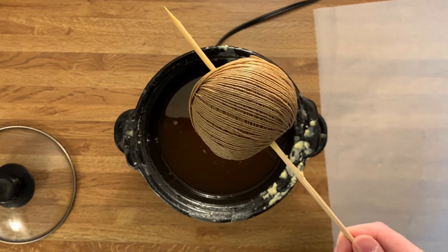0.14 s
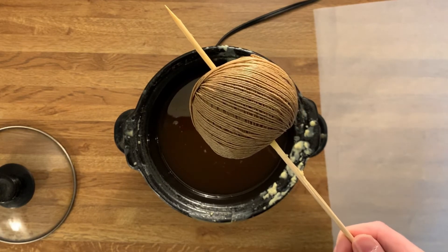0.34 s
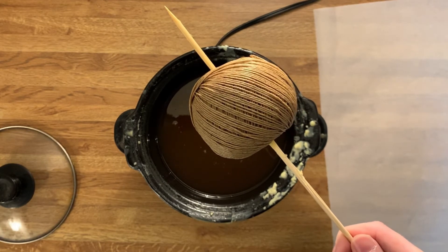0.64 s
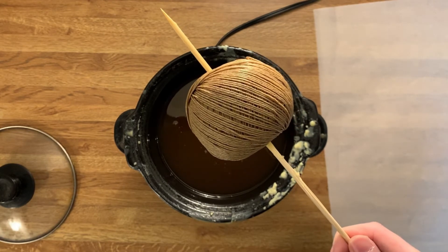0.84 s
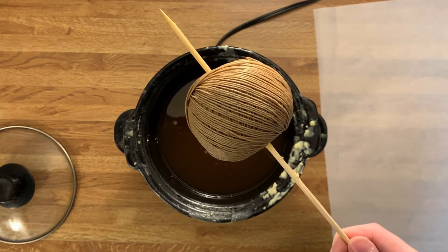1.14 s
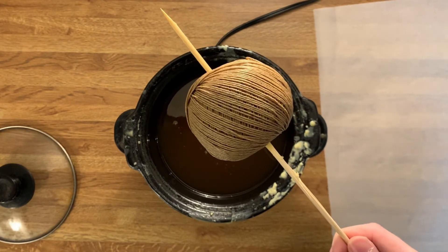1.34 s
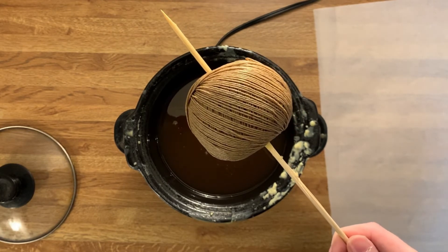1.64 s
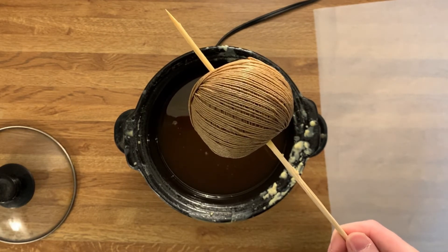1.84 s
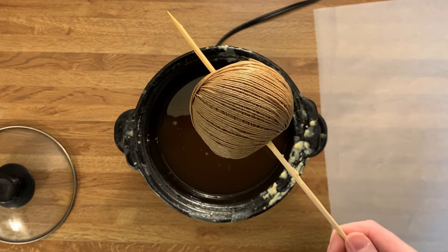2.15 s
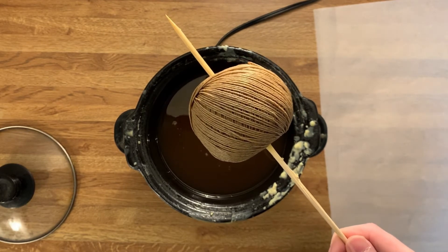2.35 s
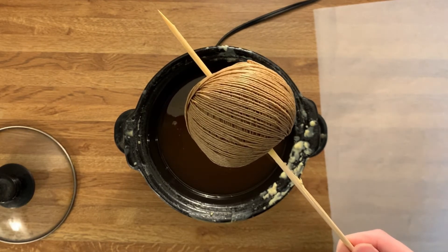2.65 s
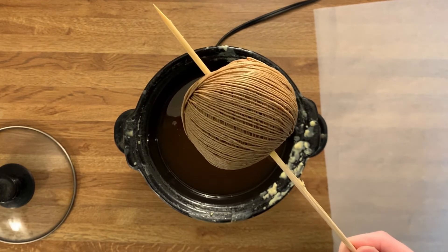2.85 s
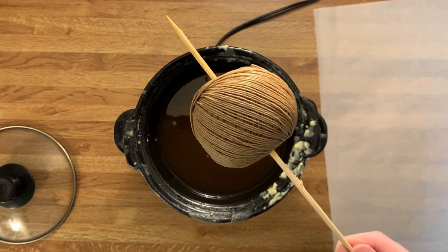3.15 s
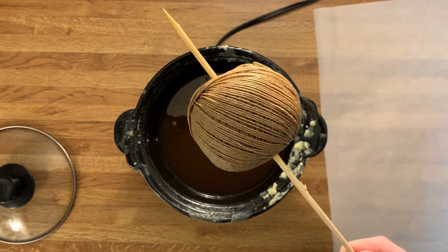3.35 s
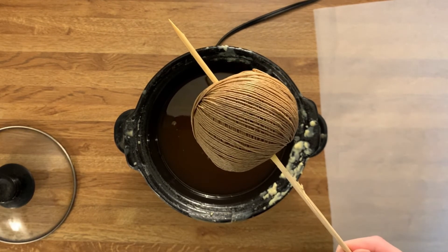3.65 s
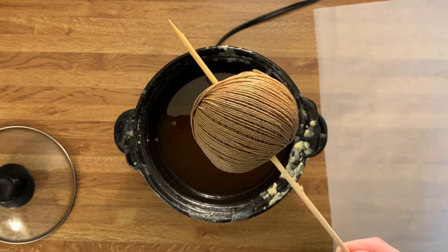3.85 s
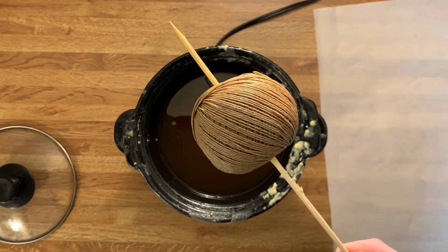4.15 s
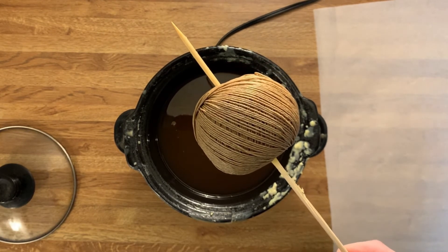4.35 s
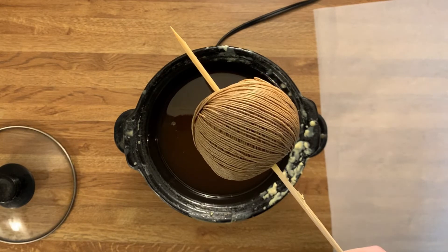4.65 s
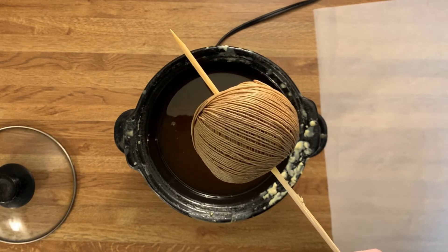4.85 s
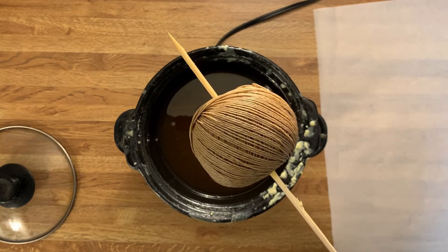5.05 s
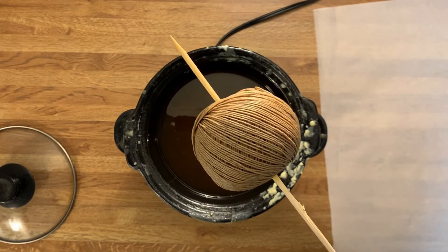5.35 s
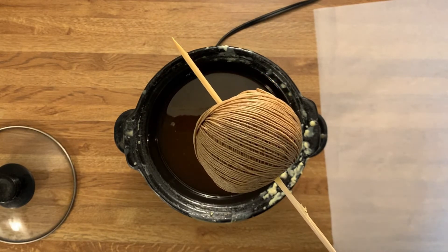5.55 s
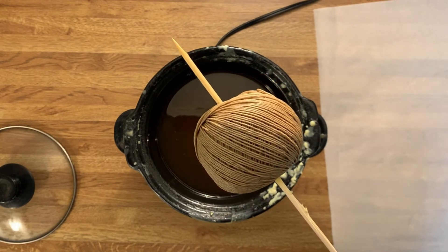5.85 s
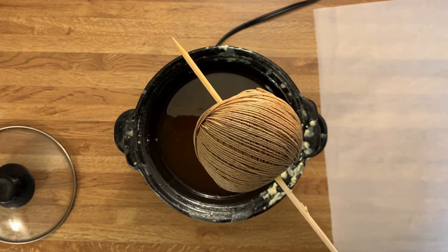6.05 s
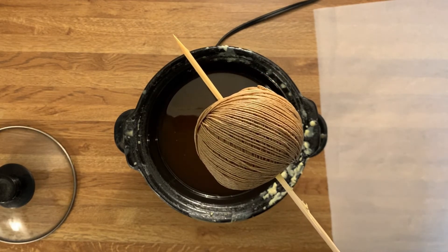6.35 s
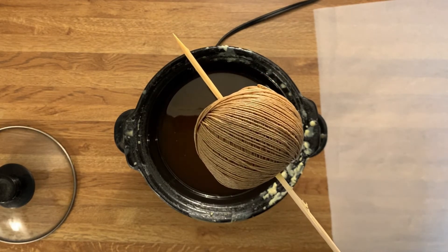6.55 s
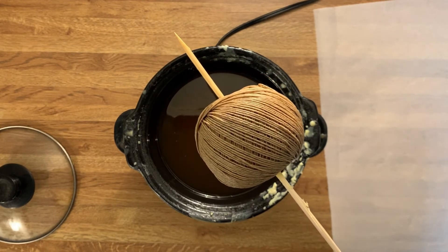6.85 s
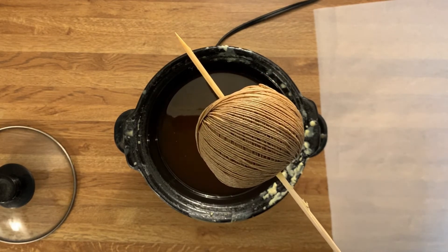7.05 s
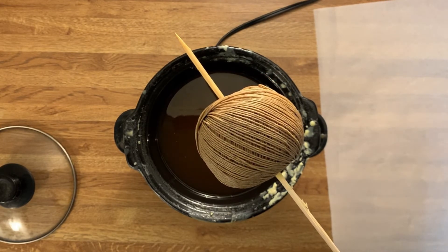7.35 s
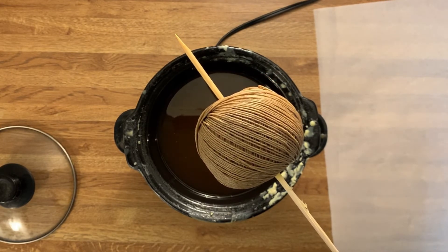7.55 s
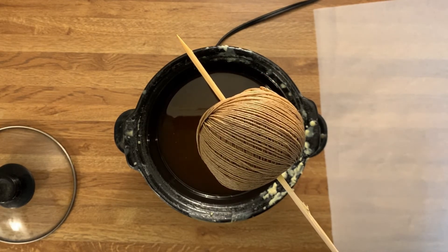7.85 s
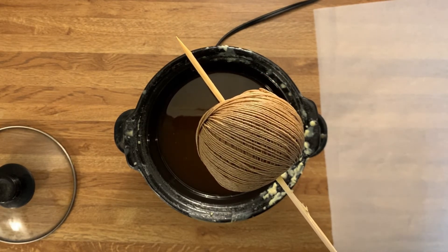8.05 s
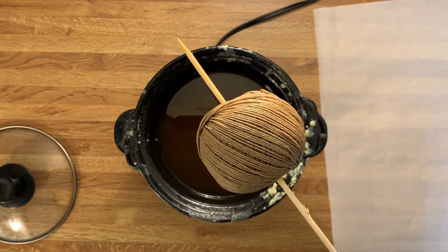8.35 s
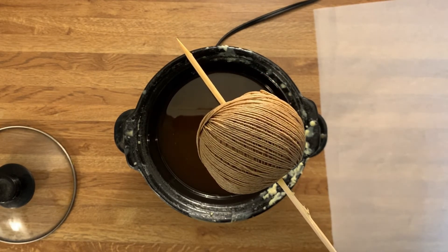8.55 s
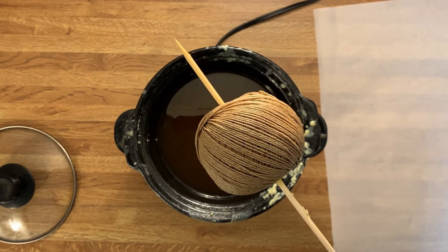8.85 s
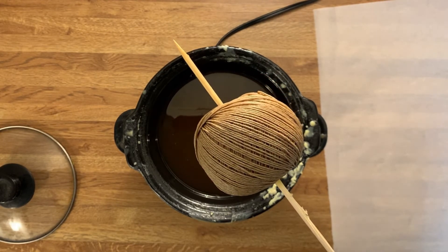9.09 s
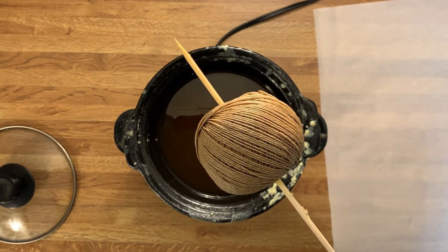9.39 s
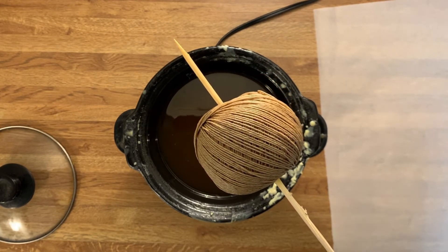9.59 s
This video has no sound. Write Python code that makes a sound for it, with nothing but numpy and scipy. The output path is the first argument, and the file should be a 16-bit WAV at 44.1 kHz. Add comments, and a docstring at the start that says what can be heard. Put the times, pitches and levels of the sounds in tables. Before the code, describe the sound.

From the start, melted wax drips quickly from a soaked ball of twine into a pot of liquid wax, heard close up indoors. The drops land irregularly, many each second, as short high plips and crisp, wet ticks, with fine spatter between them and a slight hollow ring from the pot. The patter is lighter from about 2 to 3.5 seconds, then fills out again from around 4 seconds. After about 4.5 seconds the ticks turn slightly duller, and the dripping continues in uneven flurries until the end, near 10 seconds. Underneath, an engine idling outside gives a low throbbing hum, strongest in the first second and fading by about 2.5 seconds. It swells slightly around 5 seconds, then recedes further. A faint, steady appliance hum and soft room hiss remain throughout, with very little echo.

```python
"""Melted wax drips fast from a soaked ball of twine into a pot, close under a two-port microphone.
Each drop ticks on the surface, traps a bubble and rings the hollow of the pot. An engine idles
outside and fades; an appliance motor hums indoors and beats against it."""
import sys
import numpy as np
from scipy import signal
from scipy.fft import rfft, irfft, next_fast_len
from scipy.io import wavfile
from scipy.ndimage import uniform_filter1d

SR = 44100
rng = np.random.default_rng(int(sys.argv[2]) if len(sys.argv) > 2 else 0)


def master_out(mix):
    """Clip the mix to full scale and print it as 16-bit PCM to the path in sys.argv[1]."""
    frames = np.transpose(np.atleast_2d(mix))
    ceiling = np.clip(frames, -1, 1)
    pcm = np.round(ceiling * 32767).astype(np.int16)
    wavfile.write(sys.argv[1], SR, pcm)


N = 428652

PLOPS = [(0.0248, -39.5, 1780, -3.5, 1.2), (0.1024, -44, 1967, -10.5, 14.5), (0.257, -49, 1630, -12, 3.5),
         (0.2947, -47, 1420, -20, 3.5), (0.3213, -30, 1414, -23, 2.7), (0.3666, -38.5, 2070, -14, 6.3),
         (0.4179, -42, 1884, -1.5, 3.1), (0.4662, -42.5, 1790, 0, 3.5), (0.4798, -35, 2030, -5, 1.2),
         (0.5511, -40, 1540, -8, 2.3), (0.5836, -48, 1580, -16, 3.6), (0.7183, -45, 2080, -23, 9.9),
         (0.805, -39.5, 1470, -9, 6.2), (0.84, -43.5, 1437, -4, 6.6), (0.9333, -53, 2130, -24, 4.9),
         (0.953, -46.5, 1770, -30, 4.1), (1.05, -39, 1770, -27, 1.2), (1.1214, -45.5, 1990, -5.5, 6.3),
         (1.1797, -51.5, 2100, -7, 5.5), (1.2678, -52, 1430, 1, 9.3), (1.2935, -41, 1435, -11, 7.8),
         (1.3184, -41.5, 1420, -27, 6.7), (1.4075, -47, 1925, -13, 17), (1.436, -39, 2107, -23, 6.3),
         (1.4661, -49, 2113, 1, 10.4), (1.5304, -51, 1780, -23, 5.1), (1.6282, -44.5, 1960, -25, 3.5),
         (1.6524, -46, 1760, -8, 9.5), (1.7415, -46, 2130, -1, 1.8), (1.846, -51, 2150, -3, 2.4), (1.8562, -49, 2190, -2, 3.2), (1.879, -50, 2120, -19, 3.2), (1.9307, -48, 1710, 12, 1.7),
         (2.057, -42.5, 2560, -3.5, 3.8), (2.1804, -51, 2120, 5.5, 3.8), (2.2547, -53.5, 2025, 0, 12),
         (2.4997, -52, 1990, -3, 4.4), (2.5162, -39.5, 2150, -2, 3), (2.5516, -46.5, 2020, -7, 7.6),
         (2.7606, -51.5, 1850, -6, 5.6), (2.8105, -50.5, 1740, -23, 7.8), (2.8643, -37, 2260, -29, 2.6),
         (2.9687, -43, 2045, -34, 5.7), (2.9977, -35, 2275, -21, 2.6), (3.1515, -59, 3100, -20, 1.9), (3.1547, -53, 2420, -18, 8.7),
         (3.2335, -55, 1940, -1, 5.8), (3.262, -46.5, 1760, 0, 5.3), (3.294, -51, 1664, -2, 14),
         (3.3114, -44, 1713, -6, 11.5), (3.3817, -46, 1700, -27, 1.9), (3.4426, -41, 2280, -24, 1.7),
         (3.4728, -41.5, 2190, -24, 4), (3.5468, -37, 2320, -36, 3.9),
         (3.6684, -51, 1750, 8, 2.9), (3.7087, -57, 1720, -11, 4.5), (3.7599, -45, 1690, -6.5, 2.4),
         (3.8154, -45, 1710, -14, 3.6), (3.8693, -54, 1980, -11, 5), (3.9075, -34, 2240, -21, 2.7),
         (3.9815, -50.5, 1900, 0.5, 4.2), (4.0234, -53, 1740, -17, 3.7), (4.0452, -45, 1880, -3.5, 5.1),
         (4.1131, -46.5, 2130, -5, 5.6), (4.1508, -42.5, 1930, -17, 7.3), (4.2393, -42.5, 1720, -22, 6.4),
         (4.2514, -45, 1760, -6, 4.1), (4.3041, -33.5, 2220, -26, 1.5), (4.3795, -39.5, 2190, -7, 4.7),
         (4.3841, -45, 2040, -11, 6.7), (4.4682, -37.5, 1640, -32, 1.4), (4.5057, -42, 1720, -8, 2.7),
         (4.585, -40, 2150, -26, 1.9), (4.6226, -52.5, 1870, 8.5, 6.7),
         (4.8, -42.5, 1850, -1, 1.3), (4.8978, -39, 2400, -8, 6.8),
         (4.9267, -47, 2200, -2, 6.5), (4.9495, -46, 2020, 4, 2.8), (5.002, -42, 1504, -22, 4.7),
         (5.047, -43.5, 1820, -6.5, 5), (5.1103, -43, 2060, -11, 8), (5.1637, -42.5, 2000, -12, 4.8),
         (5.1931, -38.5, 1960, -17, 2.2), (5.2128, -40.5, 1800, -11, 5.2), (5.2699, -62, 1850, -28, 3.8),
         (5.2864, -41, 2060, -21, 3), (5.3385, -44.5, 2343, -19, 2.9), (5.3875, -42.5, 2035, -7, 9.9),
         (5.455, -49, 1840, -24, 5.1), (5.491, -44, 1880, -13, 5.8), (5.5939, -36.5, 2050, -13, 3.5),
         (5.682, -42, 1940, -25, 5.4), (5.7793, -38, 2140, -10, 3.1), (5.8226, -38.5, 2030, -8.5, 4.3),
         (5.8426, -38.5, 1965, -9, 6.1), (5.9637, -39.5, 1980, -12, 4.1), (6.0623, -34, 2000, -16, 3.1),
         (6.1313, -42.5, 1860, -7.5, 9.3), (6.1564, -41, 2020, -15, 9.8), (6.1913, -42, 1770, -29, 4.1),
         (6.3034, -49.5, 2320, -6, 6.3), (6.4275, -41, 2000, -3.5, 7.1), (6.4597, -41, 2057, -12, 6.6),
         (6.4966, -43, 1870, -9, 2.6), (6.523, -42, 1990, -18, 6.4), (6.553, -43.5, 1800, -12, 7.3),
         (6.5675, -44, 1730, -8, 5.9), (6.6762, -46, 2070, -14, 6), (6.7087, -42, 1970, -20, 3.3),
         (6.7158, -38.5, 2170, -17, 3.2), (6.778, -44.5, 2040, -8, 4.3), (6.8418, -40, 2100, -22, 2.8),
         (6.8817, -46, 2300, -21, 3.4), (7.002, -46, 2010, -11, 3.5), (7.0466, -47, 2300, -26, 2.4),
         (7.0947, -51, 2130, -30, 3.4), (7.1576, -40.5, 2070, -12, 3.3),
         (7.2459, -49.5, 2140, -12, 9.4), (7.2624, -53, 2180, -15, 3.4), (7.2968, -43, 2040, -10, 3.6),
         (7.3198, -58, 2000, 7, 3.7), (7.3507, -58, 2090, -16, 4.7), (7.3771, -44.5, 2040, -18, 7.1),
         (7.4574, -41.5, 2200, -7, 4.2), (7.4854, -53, 2320, 3, 1.8), (7.52, -51, 2080, -12, 2.7),
         (7.5398, -42.5, 1930, -13, 3.4), (7.666, -41, 2100, -8.5, 2), (7.7134, -45, 1950, -19, 3.1),
         (7.7353, -48, 1790, 2, 5.1), (7.7897, -47, 2050, -9, 3.5), (7.8994, -48, 2640, -3, 2.7),
         (7.9172, -40.5, 2274, -12, 4.1), (7.9409, -56, 2080, -17, 4.1), (7.972, -38.5, 2160, -16, 5.1),
         (8.0586, -41.5, 2230, -13, 3.6), (8.1174, -46, 2120, -9, 2.8), (8.1506, -35.5, 1900, -31, 1.1),
         (8.2219, -41, 2100, -26, 2.8), (8.3115, -38.5, 2400, 0.5, 3.8), (8.4096, -52, 1800, -28, 5.7),
         (8.4361, -42, 2050, -15, 6.2), (8.4926, -56, 2480, 3, 6.9), (8.526, -46, 2240, -1, 8.1),
         (8.555, -43, 2266, -5, 4.5), (8.6318, -47, 1930, -16, 2.3), (8.6517, -44.5, 1810, -16, 2.7),
         (8.675, -38.5, 1930, -7, 4.2), (8.6986, -40, 1960, -24, 6.5), (8.7817, -38.5, 2050, -12, 2.5),
         (8.8523, -42, 2060, -4, 1.9), (8.8912, -43, 2020, -14, 4.6), (8.9116, -36, 2120, -8.5, 1.1),
         (8.954, -42.5, 2200, -11, 2.6), (8.9915, -43, 2110, -8, 4.7), (9.0508, -45, 2640, -2, 2.4),
         (9.0748, -39, 2300, -11, 3.4), (9.1147, -47.5, 2080, -8, 6.7), (9.1411, -38.5, 2035, -15, 7.4),
         (9.2878, -48.5, 2140, -15, 5.3), (9.3965, -45, 2010, -11, 4.7), (9.415, -38.5, 2170, -22, 4),
         (9.5387, -46, 1947, -17, 14), (9.5919, -46.5, 1910, 1, 17), (9.632, -40, 2060, -5, 2.7),
         (4.9595, -47.5, 1960, 10.5, 4.1), (2.0055, -60, 2380, -20, 2.2), (2.027, -54, 2450, -6, 2), (2.0465, -56, 2600, -8, 5.1),
         (2.118, -60, 2170, -14, 4.2), (2.131, -63, 2170, -6, 3.3), (2.943, -48, 1720, -27, 4.9), (2.992, -61, 2080, -20, 4),
         (3.003, -61, 2640, -10, 5.6), (3.019, -52, 2060, -19, 6.2), (3.188, -60, 2100, -12, 5), (3.849, -62, 1930, 13, 5.1), (3.881, -55, 2090, -15, 6.1),
         (7.563, -60, 2790, 7, 8), (7.599, -55, 2100, 6, 1.6), (0.4905, -40, 2040, -11, 5.3), (0.624, -50.5, 1900, -18, 5),
         (0.653, -59, 2040, 7, 6.9), (4.907, -51, 2500, -7, 2.9), (5.0135, -42, 1470, -17, 2.9)] + [(0.3419, -52, 1530, 5.5, 2.8), (0.5039, -49, 2580, -9, 7.9),
                         (0.5321, -44, 2400, -18.0, 5.6), (0.7409, -37.5, 1910, -14, 1.7),
                         (0.7562, -45, 2740, 4, 2.7), (0.764, -41, 1870, -1, 1.5),
                         (1.666, -39.5, 1840, -5.5, 1.3), (2.0759, -61, 2580, -11, 3.6),
                         (2.1925, -67, 2090, 12, 2.1), (2.6044, -52, 1420, 7, 3.5),
                         (2.6199, -49, 2750.0, -10, 5.4), (2.6476, -58, 1450, -6.0, 4.5),
                         (2.9794, -48, 1670, -25.0, 2.6), (3.5236, -41, 2100, 2, 2.2),
                         (3.9178, -46, 2600, -18, 3.3), (3.9242, -60, 2770, -8.0, 4.6),
                         (4.2035, -45, 1740, 3.5, 3), (4.3706, -52, 2240, 7, 4.3),
                         (4.9412, -43, 2000, -4, 8.9), (4.971, -42, 1890, -11, 2.5),
                         (5.726, -51, 2025, -16, 11), (6.042, -48, 2560, -13, 3.6),
                         (6.5801, -49, 1930, -3, 3.4), (6.6567, -45, 2510, -12, 2.1),
                         (7.0705, -47, 2100, -18, 3.4),
                         (7.1477, -37, 2200, -25.0, 2.7), (7.405, -45, 2340, -12, 2.4),
                         (8.2729, -43, 2750.0, -14, 2.3), (8.2903, -50, 2750.0, -20, 5),
                         (8.3253, -43.5, 2480, -1, 4.3), (8.3381, -52, 2300, 6, 4.4),
                         (8.3476, -59, 2020, 2.0, 3.2), (8.3581, -56, 2500, -4, 3.2),
                         (8.3668, -50, 2050, 1, 3.4), (8.8607, -44.5, 2045, -14, 6),
                         (9.0179, -46, 2730, -19, 2.2), (9.2259, -49, 2740, -8, 4.9),
                         (9.2429, -50, 2740, -3, 8), (9.2483, -55, 2560, -4, 2.4),
                         (9.2691, -57, 2750.0, -8.0, 2.3), (9.3037, -50, 2050, -22, 6.1),
                         (9.3105, -55, 2200, -13.0, 3.1), (9.3279, -43.5, 2400, -12, 3.5),
                         (9.3382, -45, 2700.0, 2, 2), (9.4212, -49, 2390, -18.0, 6.4),
                         (9.4277, -43, 2360, -17, 2.0), (9.4341, -58, 2500, -10.0, 1.4)]  # bubbles trapped by the larger drops: (s, level dB, pitch Hz, upper ring dB, life ms)
TICKS = [(0.046, -51, 6760), (0.0927, -47, 7000), (0.0926, -42, 10360), (0.1186, -61, 10700), (0.1393, -42, 4800),
         (0.141, -38.5, 7900), (0.1566, -32, 7500), (0.191, -43, 6800), (0.2208, -32.5, 6300), (0.2326, -37, 7700),
         (0.256, -30.5, 11100), (0.2947, -37, 10460), (0.3775, -48.5, 6400),
         (0.4212, -33.5, 10840), (0.4654, -42, 10700), (0.4798, -41, 6050), (0.5606, -45, 8250),
         (0.5886, -24, 7800), (0.6514, -50, 11200), (0.7034, -48, 6000), (0.723, -43, 7900), (0.7415, -43, 6600),
         (0.7901, -53, 6450), (0.8136, -49, 5430), (0.827, -42, 5850), (0.86, -35, 4970),
         (1.029, -48, 8200), (1.037, -42, 8300), (1.082, -53, 5400), (1.138, -48, 11500), (1.1507, -42, 8200),
         (1.223, -39, 11400), (1.265, -52, 4200), (1.2823, -28.5, 11900),
         (1.319, -45, 5500), (1.3289, -45.5, 10950), (1.3588, -45, 11250), (1.4222, -54, 5900), (1.5172, -38.5, 8400),
         (1.54, -44.5, 11300), (1.628, -54, 5900), (1.64, -48, 6000),
         (1.714, -54, 6740), (1.7412, -32.5, 10120), (1.7462, -31.5, 5460), (1.845, -45.5, 10900), (1.8779, -47, 10900),
         (1.932, -45, 4250), (2.058, -51, 6900), (2.0756, -35, 10630), (2.1184, -34.5, 5080), (2.1794, -52, 4440),
         (2.1912, -43, 11000), (2.2528, -61, 5530), (2.2873, -50, 11100), (2.366, -46, 5380),
         (2.4452, -51, 5340), (2.4589, -36.5, 4000), (2.4733, -43, 6400), (2.551, -54, 6300), (2.57, -48, 5740),
         (2.583, -50, 6130), (2.595, -29.5, 12400), (2.6314, -44, 8350), (2.6474, -52, 5840), (2.6657, -46, 9500),
         (2.7788, -50, 7800), (2.8774, -47, 5050), (2.8998, -56, 6500), (2.9346, -46, 9700),
         (2.9602, -40, 11600), (3.1512, -47, 11400), (3.169, -59, 7400), (3.18, -54, 7000), (3.187, -49, 5900), (3.2611, -50, 5370),
         (3.281, -36, 5500), (3.3246, -46, 6100), 
         (3.5465, -26.5, 7820), (3.6666, -50, 8200), (3.697, -37, 7700), (3.8556, -38.5, 4270),
         (3.8594, -40, 5200), (3.9205, -43, 5880), (3.9213, -40, 7460), (3.991, -36, 11360), (4.0224, -40, 6000),
         (4.0235, -42, 5460), (4.0457, -25.5, 7520), (4.137, -46, 8040), (4.1604, -32, 12100), (4.1611, -33, 11400),
         (4.1737, -38, 9800), (4.1924, -42, 11600), (4.2084, -35, 10700), (4.2308, -44, 7700), (4.2528, -33.5, 11200),
         (4.3116, -41, 11250), (4.3615, -43.5, 12000), (4.4345, -35, 7640), (4.4563, -47, 11300), (4.5059, -42, 7900),
         (4.5242, -42, 11300), (4.561, -54, 5950), (4.6055, -51, 6070), (4.6918, -31, 7880), (4.731, -53, 12100),
         (4.7464, -43, 5600), (4.7612, -41, 9750), (4.8638, -46, 5300), (4.898, -54, 6070), (4.9347, -46, 9900),
         (4.9507, -41, 7750), (5.0024, -32, 4200), (5.0724, -50, 5600),
         (5.2395, -53, 9900), (5.2699, -49, 7800), (5.3236, -43, 6500), (5.378, -35, 4230),
         (5.3888, -40, 7600), (5.4005, -32.5, 7170), (5.4886, -56, 10000), (5.5179, -49, 4050), (5.592, -37.5, 5660),
         (5.6155, -42.5, 9350), (5.6825, -48.5, 4160), (5.7648, -48, 4160), (5.779, -48, 5270), (5.8506, -56, 4130),
         (5.8506, -32, 9260), (5.964, -52, 4160), (6.0725, -59, 3940), (6.0696, -50, 5800), (6.134, -49, 5760),
         (6.1564, -45, 6000), (6.195, -48, 9500), (6.215, -41, 7040), (6.301, -56, 4470), (6.3704, -49, 7030),
         (6.4367, -45, 4230), (6.4966, -49, 9600), (6.5544, -48, 7700),
         (6.6089, -51, 9900), (6.6992, -48, 5670), (6.841, -43, 8330), (7, -55, 4060), (7.0563, -46, 10200),
         (7.0564, -46, 11160), (7.1178, -41, 9500), (7.1937, -56, 9900), (7.2397, -57, 5330),
         (7.2849, -52, 5940), (7.3195, -47, 5800), (7.3627, -48, 9400), (7.4233, -45.5, 7700), (7.4576, -47.5, 6130),
         (7.5845, -54, 10000), (7.63, -43.5, 7230), (7.7104, -47, 7900),
         (7.7255, -37, 7900), (7.8267, -54, 7430), (7.9164, -57, 5270), (7.943, -46, 11900),
         (7.9738, -44.5, 6160), (8.0586, -53.5, 5950), (8.1394, -48, 7800), (8.1406, -41, 9900),
         (8.2003, -56, 7760), (8.3115, -44, 7700), (8.334, -40, 7400), (8.3852, -56, 10000), (8.427, -54, 10500),
         (8.4554, -51.5, 5900), (8.525, -51, 5900), (8.5629, -41, 11500), (8.5862, -41, 7800),
         (8.611, -59, 4770), (8.6588, -38, 7800), (8.6915, -60, 8000), (8.694, -37.5, 7500),
         (8.7833, -44.5, 7160), (8.8518, -34.5, 7700), (8.8742, -47, 9600),
         (8.8907, -57, 9600), (8.92, -48, 7500), (9.0186, -55, 4100), (9.102, -54, 9900), (9.1315, -47, 4050),
         (9.1308, -49, 4040), (9.1484, -37.5, 5900), (9.2665, -53, 5960), (9.3105, -32.5, 9400),
         (9.4136, -36, 7750), 
         (9.5476, -40.5, 6500), (9.632, -53, 4270), (9.6437, -39, 7300), (4.9597, -46, 10100), (8.3402, -51, 6450), (8.336, -39, 4100), (8.352, -40, 4070), (8.3865, -58, 7500), (8.3479, -52, 7760), (4.9077, -49, 5950)] + [(0.0871, -40, 7900), (0.2025, -58, 6000.0),
                         (0.4915, -36, 4900), (0.5235, -43, 11400), (0.6634, -49, 8600),
                         (0.6754, -54, 9300), (0.7956, -45, 8350), (0.839, -56, 11600),
                         (0.879, -43, 12200), (0.9531, -53, 8140), (1.1455, -49, 8000),
                         (1.1932, -49, 11200), (1.239, -50, 11300), (1.3335, -54, 9300),
                         (1.5322, -53, 9300.0), (1.5592, -52, 9800), (1.6892, -54, 8100),
                         (1.8564, -39, 11100), (1.8663, -61, 11600), (2.131, -38, 5600),
                         (2.1381, -50, 5600), (2.2653, -37.5, 9050), (2.6047, -35, 9200),
                         (2.6202, -50, 8700), (2.707, -50.5, 8000.0), (2.9683, -50, 13500),
                         (3.1625, -44, 12300), (3.2711, -53, 7800), (3.3065, -47, 9150),
                         (3.3327, -41, 5170), (3.4719, -38.5, 9200), (3.5234, -48.0, 8500),
                         (3.6782, -35, 8360), (4.0144, -42, 7850), (4.2033, -43, 7900),
                         (4.3708, -49, 5600), (4.65, -46.5, 5500), (4.7719, -44, 9550),
                         (4.9654, -48, 7850), (4.9712, -52, 9800), (5.0132, -41, 11800),
                         (5.0937, -44, 5920), (5.286, -50, 5400.0), (5.2982, -43, 9550),
                         (5.3105, -60, 10000), (5.431, -46, 9400), (5.573, -52, 9700),
                         (5.8415, -47, 8100), (5.8852, -50, 11900.0), (5.9864, -49, 8500),
                         (6.2054, -54, 9700), (6.231, -52, 9600), (6.2408, -44.5, 8050),
                         (6.4651, -46, 7500), (6.5245, -45, 8460), (6.56, -55, 9130),
                         (6.5683, -47, 7700.0), (7.0716, -53, 9900), (7.1838, -52, 8000),
                         (7.1943, -40, 10100), (7.6879, -45, 8900), (8.1311, -44, 7900),
                         (8.1493, -59, 9400), (8.537, -54, 9450), (8.5552, -50.5, 4930),
                         (8.6319, -36, 8100), (8.652, -53, 7500), (8.6755, -60, 8700),
                         (8.6851, -42, 8700.0), (8.7024, -39, 7840), (8.7248, -45.5, 9600),
                         (8.8844, -40, 8800), (9.1239, -46, 9050), (9.1409, -35, 8900),
                         (9.2898, -48, 7100), (9.4047, -46.0, 8700), (9.4427, -41, 7600),
                         (9.4524, -33, 10230), (9.562, -38.5, 7700), (9.5859, -46, 9500),
                         (9.5932, -51, 9900.0), (9.6004, -60, 9700), (9.6818, -47, 8750)]  # bright ticks on the surface: (s, level dB, small bubble Hz)
# fine spatter too small to tell apart: (s, low dB, bright dB)
SPATTER = [(0, -60, -61.5), (.8, -63, -73.5), (1.4, -64.5, -66), (2, -72, -78), (2.7, -61.5, -73), (3.2, -71, -80), (3.9, -60, -70), (4.7, -60.5, -69), (5.3, -59.5, -72.5), (5.95, -56, -72), (6.4, -62, -75), (6.75, -60, -71), (7.3, -60, -70), (8.4, -61, -78), (9.2, -69, -73.5), (9.72, -58, -65)]
POT = [(1480, 60, -9), (1800, 60, -2), (2070, 60, 0), (2230, 90, -6), (2450, 120, -10), (3290, 90, -6), (3480, 90, -8)]  # hollow above the wax: (Hz, width Hz, dB)  # fixed
SNAP = [(1000, -20), (3000, -8.5), (4200, 3.5), (4800, -3), (5500, -3.5), (6900, -19.5), (7800, 2), (9000, 1), (10000, -2), (10700, -10), (11300, -2), (12500, 0), (13700, -9.5), (14900, -19), (15800, -10), (16800, -71)]  # colour of a tick while the ball hangs high: (Hz, dB)
PORTS = [(200, 0), (600, -2.3), (1460, -5.7), (2300, -4.1), (3500, -4.7), (6630, -.1), (15000, 12.3), (17000, 12.8)]  # (Hz, radians by which the left port leads)  # fixed
ROOM = [(1000, 0.22), (2600, 0.1), (7000, 0.11), (15000, 0.0073)]  # (Hz, t60 s)
ENGINE = [(0, 0), (.75, -4), (1.25, -9), (1.75, -14), (2.5, -16), (3.75, -18), (5.25, -13.5), (6.5, -16), (7.3, -21), (9.72, -24)]  # the engine draws away: (s, fade dB)  # fixed
RUMBLE = [(18, -29), (30, -18), (42, -8.5), (62, 7), (78, 0), (115, -0.5), (160, -8.5), (215, -18), (260, -31), (330, -57)]  # noise around the orders: (Hz, dB per Hz)
MOTOR = [(59.2, -57), (120, -69)]  # appliance lines: (Hz, dB)  # fixed
AIR_MID = [(100, -40), (200, -10.5), (300, 2), (430, -3), (620, 2.5), (720, -4.5), (950, 2), (1500, 2), (3000, -19), (6000, -19), (16500, -22.5)]  # room tone and hiss, sum of ports: (Hz, dB per Hz)
AIR_SIDE = [(40, -16), (60, -7.5), (130, -8.5), (250, -24), (420, -22.5), (700, -18), (1500, -19), (3000, -30.5), (6000, -44), (16500, -36)]  # difference of ports: (Hz, dB per Hz)
EDGE_HZ = 16900  # fixed
T = np.arange(N) / SR
SPEED = [(0, 12.45), (.45, 12.32), (1.35, 12.11), (3, 12.15), (4.65, 12.39), (5.2, 12.43), (9.72, 12.43)]  # idling engine: (s, cycles a second)  # fixed
UPPER_HZ, UPPER_SPREAD, UPPER_LIFE = 3323, 0.042, 0.98  # each drop also rings a higher mode
TICK_MS, TICK_DB, SHORTER_DB_PER_DB = 1.063, -40, 0.3545   # a harder tick is shorter
ORDERS = [3, 4, 5, 7, 8, 9, 11, 12, 16]  # fixed
VOICE = [(-61, .6, 0), (-40, 1, 0), (-54, .17, 0), (-55, .8, .8), (-49, .95, 1), (-48, .9, 0), (-61, .8, .8), (-62, .8, .8), (-72, .6, .8)]  # for each order: (dB at the start, share of the fade, lag of the fade s)  # fixed
CRATER_WIDTH_HZ, CRATER_SPREAD, HOLLOW_DB = 162, 0.031, -9.5  # droplets ring at the pitch of the larger drops beside them

SPLASH = [(3263, 180, -12.5)]  # higher ring of the droplets: (Hz, width Hz, dB)
SWELL_DB = 1.8  # fixed
AIR_RINGS = [(606, 25, -90), (930, 35, -82)]  # faint fuzzy tones in the room tone: (Hz, width Hz, dB)  # fixed
SNAP_LOWERED = [(1500, -42), (3300, -56), (4200, 9.5), (4800, -7.5), (5500, -4.5), (6600, -21), (7700, -0.5), (8900, 3.5), (9400, -6), (9900, 6), (10700, -13.5), (12500, -3.5), (13800, -17), (14900, -7), (15800, -24), (16800, -64)]  # duller on top once it hangs lower: (Hz, dB)
LOWERED_S = 4.5
SMALL_HZ = 2280  # fixed
PATTER_HZ, PATTER_WIDTH_HZ, PATTER_DB = 2860, 1470, -9  # the sharp low part of the fine clicks
RUMBLE_START_DB, RUMBLE_SHARE = -51, 0.56
WAVER_DB = .33  # per order number: higher orders waver more  # fixed
SMALL_CLIMB, SMALL_WAVER = 0.17, .75  # small bubbles above that pitch chirp upward and splutter  # fixed
FIZZ_HZ, FIZZ_CLIMB, FIZZ_LIFE_S = (2150, 2400, 2650, 2900), .3, .003  # tiny bubbles that chirp up and burst  # fixed
FIZZ_DB = -8


def gain_of(db):
    """Decibels to amplitude."""
    return 10 ** (np.asarray(db) / 20)


def evened(x):
    """Scales to rms 1."""
    return x / np.sqrt(np.mean(x ** 2) + 1e-20)


def read(points, hz):
    """Reads a spectrum on a log-frequency axis."""
    f, value = np.transpose(points)
    return np.interp(np.log(hz + 1), np.log(f + 1), value)


def coloured(x, points):
    """Gives x the spectrum of a table."""
    size = next_fast_len(N)
    return irfft(rfft(x, size) * gain_of(read(points, np.fft.rfftfreq(size, 1 / SR))), size)[:N]


def add(mix, s, sound):
    """Mixes a sound in at time s."""
    part = mix[max(round(s * SR), 0):][:len(sound)]
    part += sound[:len(part)]


def bubble(hz, life, climb, t):
    """A sine that swells in a millisecond, sags, and dies as the bubble bursts; its pitch climbs meanwhile."""
    u = t / life
    swell = 1 - np.exp(-(t / min(.0012, life / 3)) ** 2)  # fixed
    return np.sin(2 * np.pi * hz * t * (1 + climb * np.minimum(u, 2) / 2)) * swell * gain_of(-4.0 * u - 1.0 * u ** 3)


def hollow():
    """Impulse response of the pot's hollow, peak 1."""
    t = np.arange(3000) / SR
    ring = sum(gain_of(db) * np.sin(2 * np.pi * hz * t) * np.exp(-np.pi * width * t) for hz, width, db in POT)
    return ring / abs(ring).max()


def plops():
    """A wavering bubble at each drop's own pitch with a higher ring, a wet slap at its start, and the hollow ringing."""
    t, out, blows = np.arange(2000) / SR, np.zeros(N), np.zeros(N)
    chance = rng.standard_normal((len(PLOPS), len(t) + 2))
    waver = evened(uniform_filter1d(uniform_filter1d(chance[:, 2:], 30, 1), 30, 1))
    for (s, db, hz, upper_db, ms), z, w in zip(PLOPS, chance, waver):
        life = max(ms, 1.5) / 1000
        upper = gain_of(upper_db) * bubble(UPPER_HZ * (1 + UPPER_SPREAD * np.tanh(z[1])), UPPER_LIFE * life, 0.012, t)
        add(out, s, gain_of(db + 1.5) * roughened(bubble(hz, life, 0.017 * z[0] ** 2 + SMALL_CLIMB * (hz > SMALL_HZ), t) + upper, 1 + (SMALL_WAVER if hz > SMALL_HZ else .45) * w))
        add(blows, s, gain_of(db) * evened(z[2:302] * np.exp(-t[:300] / 0.0012)) / np.sqrt(300))
    return out + gain_of(-21.0) * signal.oaconvolve(blows, hollow())[:N]


def ticks():
    """A burst of crackle with a tiny, fast-rising bubble inside; the burst also rings the hollow."""
    t, crack, ping = np.arange(800) / SR, np.zeros(N), np.zeros(N)
    chance = rng.standard_normal((len(TICKS), len(t) + 1))
    for (s, db, hz), z in zip(TICKS, chance):
        length = TICK_MS / 1000 * gain_of(SHORTER_DB_PER_DB * (TICK_DB - db))
        add(crack, s, gain_of(db) * roughened(np.exp(-t / (0.63 * length)) * (1 - np.exp(-t / 0.00039)), z[1:]))
        add(ping, s, gain_of(db) * roughened(bubble(hz, 1.11 * length, 0.034 * abs(z[0]), t), 1 + 0.74 * evened(uniform_filter1d(z[:0:-1], 10))))
    ring = signal.oaconvolve(crack, hollow())[:N]
    ping *= gain_of(2.5)
    return gain_of(9.0) * snapped(crack) + gain_of(-56) * ring, ping


def spatter():
    """Small droplets, thickest just after each drop: plips in the crater of the stream or in one mode of the hollow, tiny bubbles, and bright clicks."""
    s, low_db, bright_db = np.transpose(SPATTER)
    drops = np.zeros(N)
    drops[(np.array([row[0] for row in PLOPS + TICKS]) * SR).astype(int)] = 1
    flurry = signal.oaconvolve(drops, np.exp(-np.arange(6000) / (.03 * SR)))[:N]
    per_s = np.array([[90.], [5.], [170.]]) + np.array([[90.], [290.], [150.]]) * flurry
    u, e = rng.random((3, N)), np.minimum(rng.exponential(1, (3, N)), 2.5)  # fixed
    clicks = gain_of(np.array([[9.2], [9.0], [9.2]]) * e) * (u < per_s / SR)
    mode, t = rng.integers(0, len(POT), N), np.arange(1500) / SR
    modes = sum(signal.oaconvolve(clicks[0] * (mode == k), gain_of(db) * bubble(hz, .5 / width, 0.0032, t))[:N] for k, (hz, width, db) in enumerate(POT))
    size = rng.integers(0, 2 * len(FIZZ_HZ), N)  # every second droplet leaves a bubble
    fizz = sum(signal.oaconvolve(clicks[0] * (size == k), bubble(hz, FIZZ_LIFE_S, FIZZ_CLIMB, t))[:N] for k, hz in enumerate(FIZZ_HZ))
    rows = np.array(sorted(PLOPS))
    pitch = np.interp(T, rows[:, 0], rows[:, 2]) * (1 + CRATER_SPREAD * evened(uniform_filter1d(rng.standard_normal(N), 600)))
    crater = resonate(resonate(clicks[2], pitch, CRATER_WIDTH_HZ), pitch, 2.5 * CRATER_WIDTH_HZ)
    splash = sum(gain_of(db) * evened(resonate(resonate(clicks[2], np.full(N, hz), width), np.full(N, hz), width)) for hz, width, db in SPLASH)
    low = (evened(crater) + splash) * (7.1 + flurry) ** 0.056 + gain_of(HOLLOW_DB) * evened(modes) + gain_of(FIZZ_DB) * evened(fizz)
    burst = np.convolve(clicks[1], np.exp(-np.arange(300) / 20.0))[:N] * rng.standard_normal(N)
    low = low + gain_of(PATTER_DB) * evened(resonate(burst, np.full(N, PATTER_HZ), PATTER_WIDTH_HZ))
    return gain_of(np.interp(T, s, low_db)) * evened(low), gain_of(np.interp(T, s, bright_db)) * evened(snapped(burst))


def room(x):
    """Sparse taps of random sign, each band dying at its own speed; drops land in changing spots, so three tails take turns."""
    out = np.zeros((2, N))
    for k in range(3):
        taps = np.zeros((2, 12000))
        at = np.arange(100, 11980, 20) + rng.integers(0, 20, (2, 594))  # fixed
        np.put_along_axis(taps, at, rng.choice([-1., 1.], at.shape), 1)
        taps[1] = .75 * taps[0] + .66 * taps[1]  # fixed
        hz, t, z = signal.stft(taps, SR, nperseg=128)
        tail = signal.istft(z * gain_of(-60 * t / read(ROOM, hz)[:, None]), SR, nperseg=128)[1]
        turn = np.sqrt(2 / 3) * np.cos(2 * np.pi * (7 * T + k / 3))  # fixed
        out += signal.oaconvolve((x * turn)[None], tail / np.linalg.norm(tail[0]), axes=1)[:, :N]
    return out


def ports(pair):
    """Sound from the pot reaches the right port later, by a phase that depends on pitch."""
    size = next_fast_len(N)
    late = np.exp(-1j * np.interp(np.fft.rfftfreq(size, 1 / SR), *np.transpose(PORTS)))
    return np.array([pair[0], irfft(rfft(pair[1], size) * late, size)[:N]])


def hum():
    """Engine orders on its speed, each fading by its own share and wavering; rumble around them; steady appliance lines."""
    fade = np.interp(T, *np.transpose(ENGINE))
    turn = 2 * np.pi * np.cumsum(np.interp(T, *np.transpose(SPEED))) / SR
    waver = WAVER_DB * rng.standard_normal((len(ORDERS), 24))
    engine = sum(gain_of(db + share * np.interp(T - lag, *np.transpose(ENGINE)) + np.interp(T, np.linspace(0, T[-1], len(w)), k * w)) * np.sin(k * turn + k * k)
                 for k, (db, share, lag), w in zip(ORDERS, VOICE, waver))
    motor = sum(gain_of(db) * np.sin(2 * np.pi * hz * T) for hz, db in MOTOR)
    rumble = gain_of(RUMBLE_START_DB + RUMBLE_SHARE * fade) * evened(coloured(rng.standard_normal(N), RUMBLE))
    return np.sqrt(2) * (engine + motor) + rumble


def air():
    """Room tone that swells a little, and microphone hiss."""
    mid, side = (evened(coloured(rng.standard_normal(N), c)) for c in (AIR_MID, AIR_SIDE))
    rings = sum(gain_of(db) * evened(resonate(rng.standard_normal((2, N)), np.full(N, hz), width)) for hz, width, db in AIR_RINGS)
    swell = evened(uniform_filter1d(uniform_filter1d(rng.standard_normal(N), 3000), 3000))
    return gain_of(-74 + SWELL_DB * swell) * mid + rings + gain_of(-68.5) * side * np.array([[1], [-1]])


def resonate(x, hz, width):
    """A resonance that follows the pitch curve hz."""
    turn, r = np.exp(2j * np.pi * np.cumsum(hz) / SR), np.exp(-np.pi * width / SR)
    return 2 * (turn * signal.lfilter([1 - r], [1, -r], x / turn)).real




def snapped(x):
    """Gives crackle the colour of a tick, before and after the ball is lowered."""
    return coloured(x * (T < LOWERED_S), SNAP) + coloured(x * (T >= LOWERED_S), SNAP_LOWERED)


def roughened(sound, shake):
    """Shakes the loudness of a short sound and keeps its energy."""
    return sound * shake * np.linalg.norm(sound) / np.linalg.norm(sound * shake)


def scene():
    """Drops with their room tail, over hum and air."""
    low_spatter, bright_spatter = spatter()
    small_pot = signal.butter(2, 1000, "high", fs=SR, output="sos")  # a small pot radiates no bass  # fixed
    crack, ping = ticks()
    wet, crisp, ping = signal.sosfilt(small_pot, [plops() + low_spatter, crack + bright_spatter, ping])
    tail = room(gain_of(-7.0) * wet + gain_of(-4) * crisp + gain_of(-9) * ping)  # fixed
    low = hum()
    low = gain_of([[.8], [-.8]]) * np.array([np.roll(low, 8), low])  # the hum reaches the right port first
    return ports(wet + crisp + ping + tail) + low + air()


def record(dry):
    """The band limit."""
    return signal.oaconvolve(dry, signal.firwin(511, EDGE_HZ, window=("kaiser", 9), fs=SR)[None], "same")


dry = scene()
out = record(dry)
master_out(out)
```